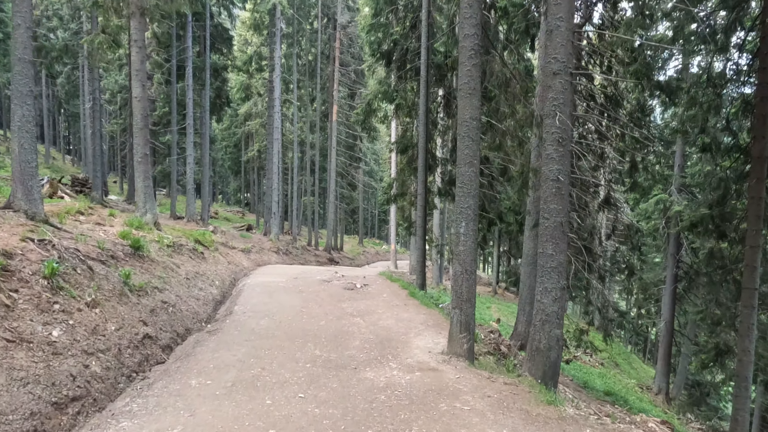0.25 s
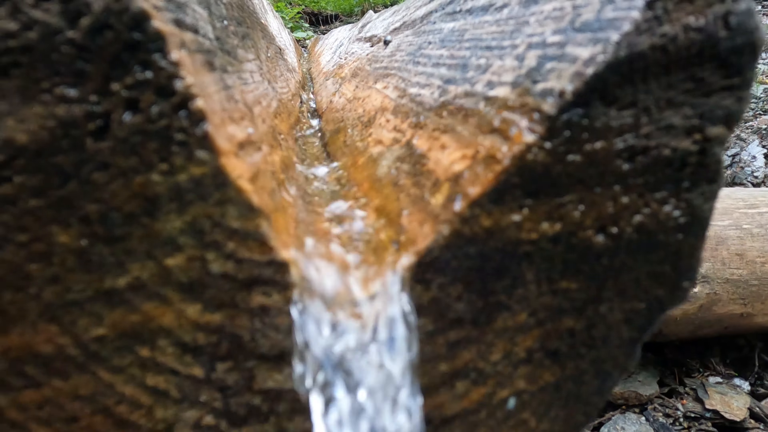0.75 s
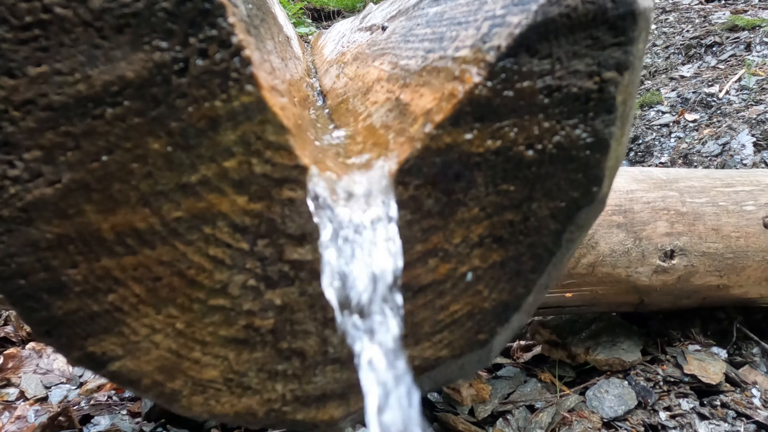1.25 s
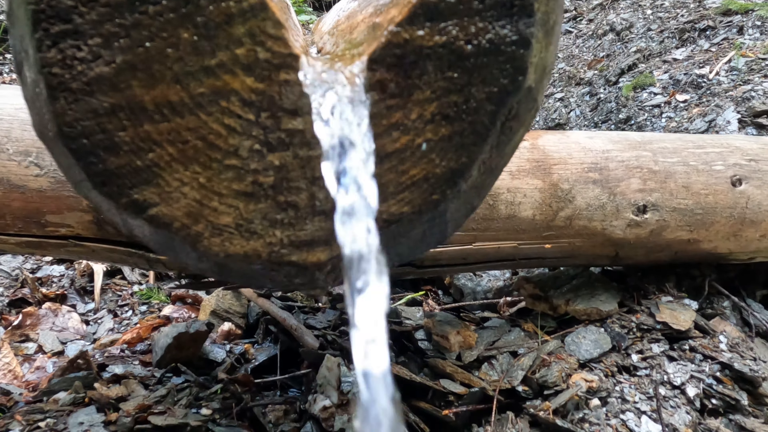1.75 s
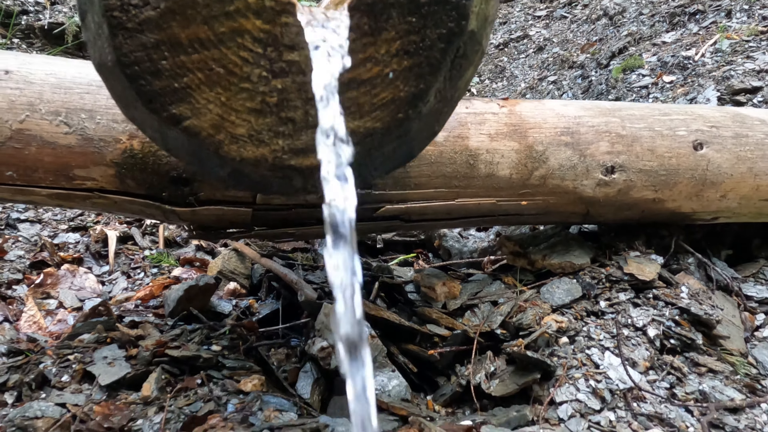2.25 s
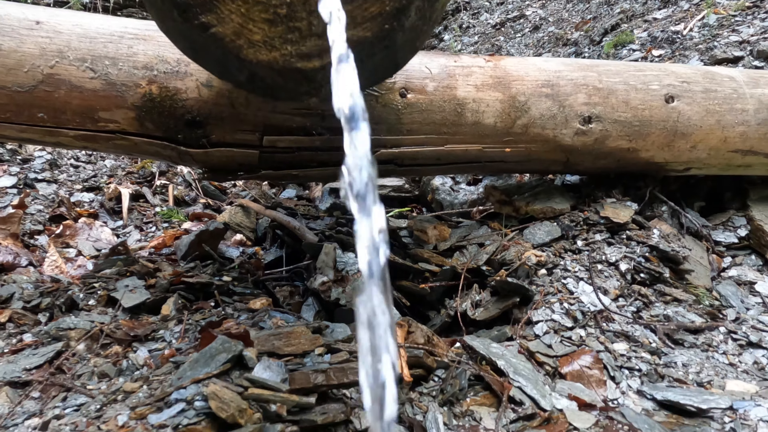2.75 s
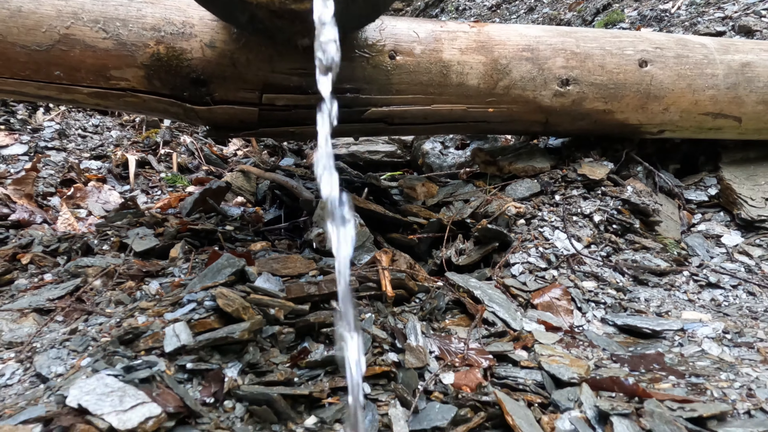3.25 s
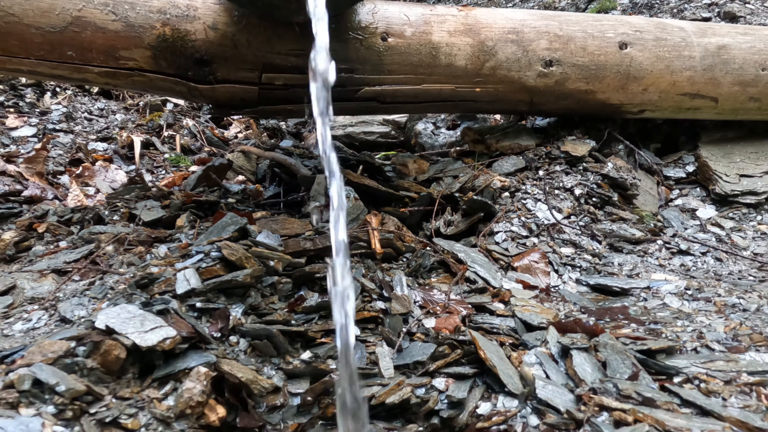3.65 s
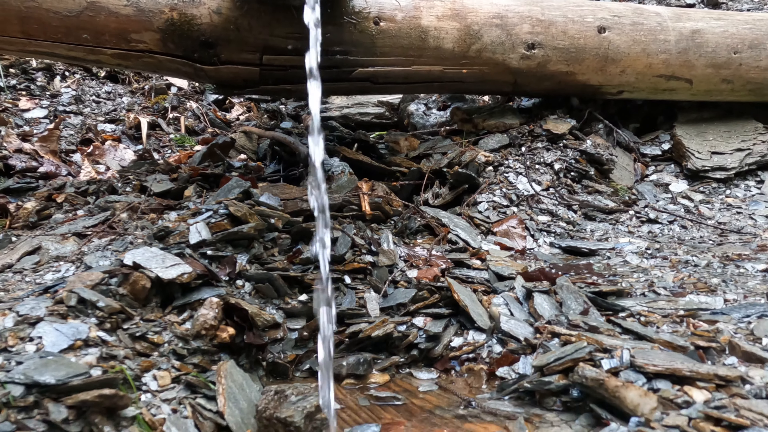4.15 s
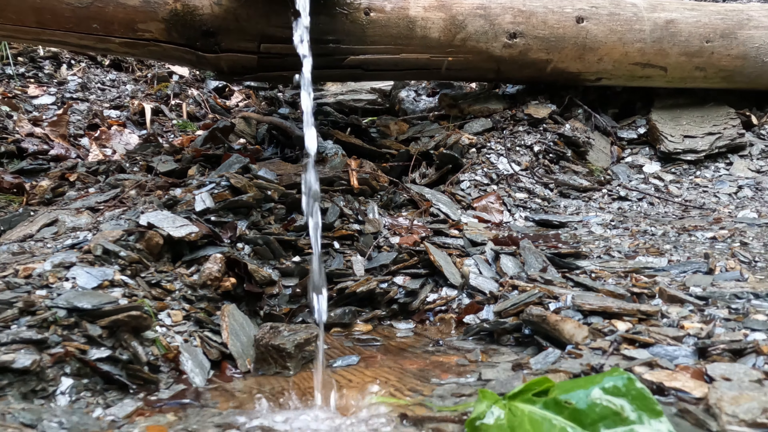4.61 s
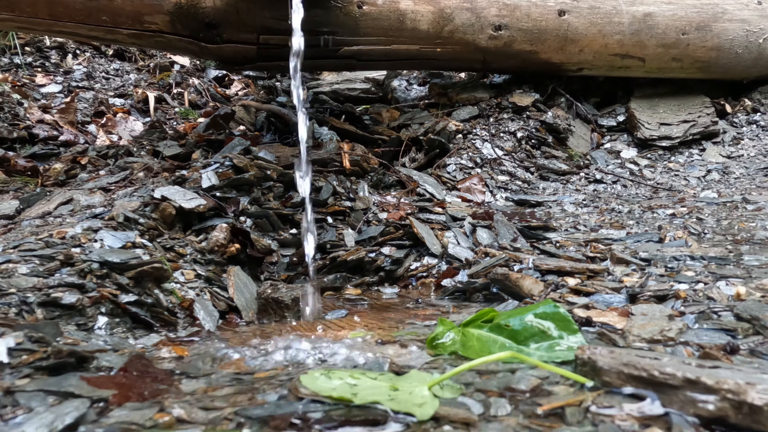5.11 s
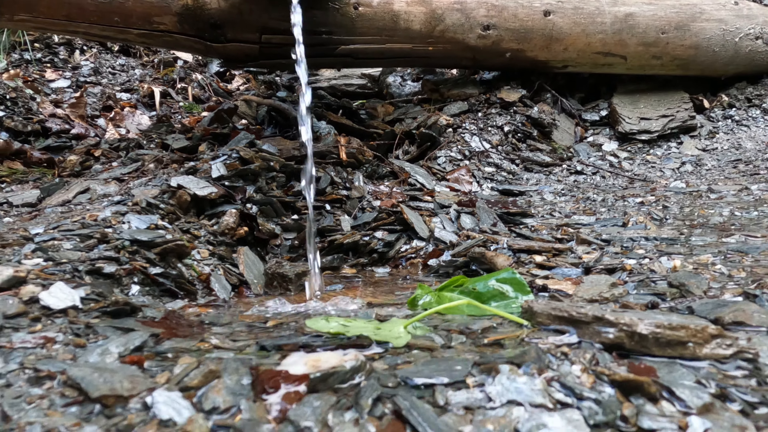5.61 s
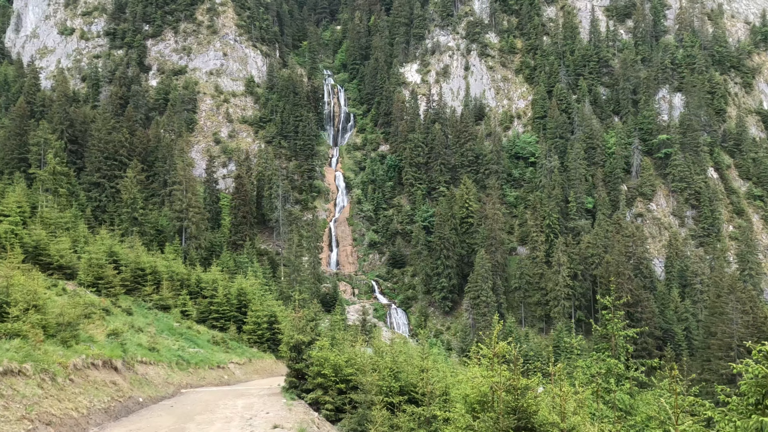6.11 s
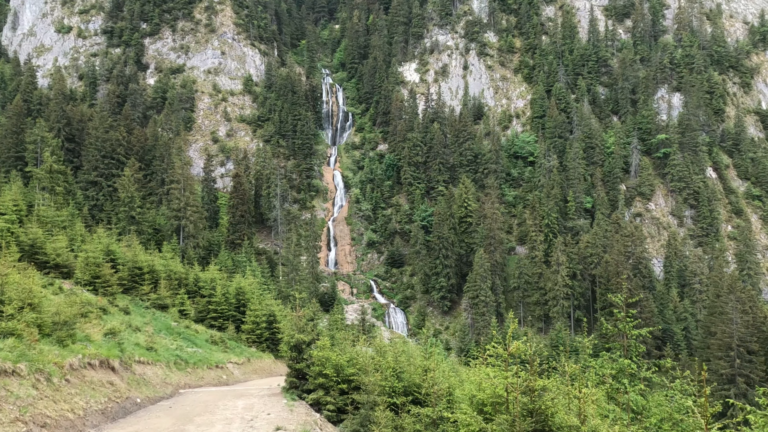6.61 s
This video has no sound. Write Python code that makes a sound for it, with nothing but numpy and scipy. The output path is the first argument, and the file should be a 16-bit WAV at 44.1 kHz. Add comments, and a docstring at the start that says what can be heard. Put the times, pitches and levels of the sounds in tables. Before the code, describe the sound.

A quiet forest path with faint bird whistles and dull footfalls cuts to a thin stream spattering on wet slate, then to a distant waterfall's hiss.

```python
"""Three places in a forest, one after another, with a light wind rumbling on the microphones throughout.
First a quiet track: far bird whistles as gliding tones, soft footfalls as short thumps with grit. Then, close by,
a thin stream falls from a log onto wet slate chips: its slugs slap as bursts of noise, trap air that pops and
rings as decaying tones, and throw up spray of shaped noise. Last the far waterfall, a smooth shaped hiss."""
import sys
import numpy as np
from scipy import signal
from scipy.fft import rfft, irfft
from scipy.io import wavfile
from scipy.ndimage import uniform_filter1d, map_coordinates

SR = 44100
rng = np.random.default_rng(int(sys.argv[2]) if len(sys.argv) > 2 else 0)


def to_wav(sig):
    """Store sig (one row per channel, or 1-D mono) as 16-bit WAV at the path in sys.argv[1].

    Samples outside -1..1 are clipped; the rate is SR.
    """
    pcm = np.clip(np.atleast_2d(sig), -1, 1) * 32767
    pcm = np.round(pcm).astype(np.int16)
    wavfile.write(sys.argv[1], SR, pcm.T)  # frames by channels


N = 302967

# When we stand at the stream. One row: start in seconds, end in seconds.
STREAM_SPAN = (.363, 5.899)
# The largest ringing air bubbles.
# Each row: start in seconds, peak in dB, pitch at the loudest moment in Hz, length in cycles.
BUBBLES = [(0.5062, -35, 720, 5), (0.455, -23.5, 1630, 19), (0.588, -23, 1226, 4.9), (0.598, -25, 1410, 29),
           (0.7215, -27.5, 660, 10), (0.816, -26, 1340, 10), (1.1284, -38, 546, 14),
           (1.154, -31, 990, 12.5), (1.817, -18, 1640, 1.1), (1.9222, -24.5, 2180, 17),
           (1.939, -28, 1164, 6.3), (2.048, -26, 1280, 7.3), (2.126, -32.5, 1010, 16),
           (2.304, -39, 852, 21), (2.4047, -25, 1156, 16), (2.8673, -28.5, 785, 5.9),
           (2.9101, -18, 886, 5.3), (2.935, -18.5, 2140, 16), (3.0873, -24.5, 611, 7.1),
           (3.1107, -38, 655, 18), (3.2065, -19.5, 1287, 11), (3.281, -12.5, 1648, 2),
           (3.315, -17.5, 1830, 5.3), (3.334, -18.5, 2000, 5.6), (3.3826, -22, 827, 6.1),
           (3.403, -13.5, 1620, 1.7), (3.633, -27, 1490, 24), (3.732, -23.5, 1058, 13),
           (3.859, -21.5, 1590, 3.7), (3.947, -27, 584, 3.3), (4.063, -20, 1036, 8.9),
           (4.0643, -16.5, 2080, 6.6), (4.0945, -20.5, 1347, 22), (4.1733, -27, 529, 7.2),
           (4.2714, -23, 750, 1.6), (4.3098, -13, 2110, 6.1), (4.3379, -23.5, 897, 11.5),
           (4.48, -18.5, 2040, 5.8), (4.495, -19.5, 1440, 3.8), (4.691, -17, 1370, 5.4),
           (4.8067, -14, 1930, 3.2), (4.875, -23.5, 887, 4.4), (4.8799, -19.5, 1497, 9.2),
           (4.8954, -29.5, 720, 9.1), (5.3257, -21, 1306, 14), (5.4598, -27, 1460, 19),
           (5.486, -24, 919, 4), (5.579, -24, 880, 2.1), (5.849, -25, 670, 1.6)]
# Slugs of water slapping the stone. Each row: start in seconds, peak of the pop in dB,
# its middle pitch in Hz, upward sweep in octaves, length in ms.
SPLATS = [(0.3973, -18, 5900, 0.82, 2.3), (0.5292, -14.4, 4460, 0.75, 2.1), (0.6282, -19, 3220, 0.55, 2.9),
          (0.6504, -15.5, 4170, 0.8, 2.2), (0.775, -14, 2800.0, 0.3, 2.8), (0.7885, -20.5, 4500, 1.6, 2.05),
          (0.8617, -16.5, 3120, 0.9, 5), (0.867, -18, 2880, 0.35, 3), (0.976, -16.5, 5200, 0.41, 2.7),
          (0.9944, -15.6, 3940.0, 0.92, 3.3), (1.1214, -10.5, 2980, 1.9, 2.2),
          (1.2629, -16.5, 6330, 1.2, 2.8), (1.4958, -17.5, 2810, 0.05, 2.6), (1.6477, -16, 7500, 0.05, 1.9),
          (1.6681, -15, 3980, 1.4, 1.4), (1.75, -17, 3940.0, 0.5, 1.9), (1.7572, -19.5, 3970, 0.49, 4.8),
          (1.7926, -14, 3600, 0.05, 2), (1.849, -15, 2620, 0.05, 2.4), (2.1706, -14.3, 2760, 0.05, 1.7),
          (2.2204, -13.5, 3900, 2.4, 1.9), (2.2704, -12.5, 7300, 0.05, 1.2),
          (2.2996, -11.5, 4100, 1.9, 1.3), (2.3124, -11, 5270.0, 0.05, 1.5), (2.3284, -14, 3470, 0.05, 2.4),
          (2.3955, -15, 5760, 0.68, 0.88), (2.455, -12.8, 3460, 0.3, 1.63),
          (2.4591, -15.5, 3260, 0.05, 2.8), (2.493, -18, 3700, 0.05, 1.3), (2.5267, -14, 6500, 1.66, 1.34),
          (2.5788, -16, 4740, 0.05, 0.83), (2.621, -13.5, 2380, 1.4, 5.6), (2.748, -10.5, 3730, 1.74, 3.9),
          (2.822, -11, 3240.0, 0.05, 1.6), (2.8715, -12.5, 6500, 0.05, 1.5), (3.0117, -11, 4420, 2, 3),
          (3.0479, -20, 2800.0, 0.05, 2.8), (3.109, -16.5, 3020, 0.05, 3), (3.1243, -14, 2850, 0.05, 2.6),
          (3.1486, -12.1, 3170, 0.05, 2.1), (3.3615, -12.8, 2480, 0.3, 1.8),
          (3.3753, -14, 2670.0, 0.27, 1.1), (3.4694, -11.0, 3470, 2.5, 4.6),
          (3.5099, -8.5, 5020.0, 0.35, 1.34), (3.5274, -9.5, 6800, 1.4, 0.94),
          (3.586, -12, 7200, 0.72, 2.5), (3.6643, -16, 7780.0, 0.82, 2.1), (3.6992, -5.5, 3220, 0.41, 0.98),
          (3.754, -13.5, 5540.0, 1.25, 3.1), (3.809, -13, 5300, 0.05, 2.6),
          (3.9476, -14.5, 5440, 0.046, 1.7), (4.1098, -14.5, 2410, 0.05, 2.7),
          (4.118, -14, 2310.0, 0.3, 5.3), (4.15, -13.5, 2710, 0.05, 5.4), (4.225, -17.5, 4500, 0.05, 4.1),
          (4.3896, -7.5, 5150, 0.05, 0.75), (4.6488, -13, 4050, 1.9, 2.6), (4.7591, -12, 3480, 2.4, 1.9),
          (4.9146, -10, 5860, 1.5, 1.2), (5.1256, -14.5, 3140, 0.05, 1.6), (5.1767, -15, 4060, 2.1, 2.6),
          (5.2009, -7, 3220, 0.9, 2.8), (5.2739, -13.5, 5700, 1.8, 1.2), (5.3677, -14, 4740, 3.6, 1.46),
          (5.4798, -22, 4560.0, 0.05, 4), (5.6186, -13, 7040, 0.05, 1.2),
          (5.6364, -18.1, 3240.0, 0.05, 2.6), (5.8114, -19.5, 5830, 0.05, 3.1)]
# Flow of the stream. Each row: time in seconds, spatter in dB, gurgle of small bubbles above the spatter in dB.
FLOW = [(.36, -34.5, -26), (.9, -36, -4.5), (1.3, -37, -15.5), (1.9, -33, -11), (2.5, -34.5, -5.5),
        (3, -32, -1.5), (3.5, -31.5, -9), (4, -32, -3), (4.5, -33.5, -4), (5, -32.5, -6),
        (5.5, -35.5, -5.5), (5.9, -41, -3.5)]
# The stream breaks and little water lands. Each row: centre in seconds, length in seconds.
LULLS = [(1.249, 0.046), (1.888, 0.034), (2.102, 0.021), (2.241, 0.06), (2.51, 0.065), (3.592, 0.03),
         (5.103, 0.028), (5.242, 0.1), (5.44, 0.026)]
# Colour of the spray. Each row: frequency in Hz, relative density in dB per Hz.
SPRAY = [(240, -14.5), (450, -3), (710, -16.5), (911, 2), (1720, 0), (2780, -1), (4230, -3.5), (5340, 0.5),
         (12000, -15), (14900, -36), (16300, -53)]
# Width of the spray. Each row: frequency in Hz, left-right likeness from 0 to 1.
SPRAY_SAME = [(60, 0.53), (550, 0.49), (15000, 1)]
# Sideways lean of the stream. Each row: frequency in Hz, left minus right in dB.
SPRAY_LEAN = [(5000, 0.2), (9000, 1), (15000, 3.5)]
# Echo off the log end as the microphones move. Each row: time in seconds, delay in ms, level in dB.
LOG_ECHO = [(.5, .27, -7), (1.2, .51, -6), (1.8, .76, -6), (2.8, 1.05, -18)]
# The microphones turn. Each row: time in seconds, left minus right in dB.
TURN = [(.4, 2), (2, 3), (3.3, 0), (5.9, 0)]
# Far bird calls. Each row: start in seconds, held note in seconds, level before flutter in dB.
CALLS = [(.033, .05, -63), (.205, .064, -63)]
# End of a lower whistle. One row: start in seconds, length in seconds, pitch in Hz, level before flutter in dB.
PEEP = (.004, .026, 4290, -61)
# Footfalls. Each row: start in seconds, level in dB, pitch the thump settles to in Hz.
STEPS = [(0.073, -38, 180), (0.1526, -25.5, 170), (0.193, -33, 307)]
# Steady air of the track, of the glade at the stream, and of the far falls.
# Each row: frequency in Hz, relative density in dB per Hz.
TRACK_AIR = [(53, -34), (90, -16), (210, -10), (345, -8.5), (977, -12.5), (2450, -17), (2650, -21.5),
             (6720, -30), (7330, -40), (16000, -53)]
GLADE_AIR = [(53, -20), (90, 7), (721, -7), (926, -47), (1800, -7), (2730, -1), (5560, -11.5), (9000, -13),
             (11700, -23), (19800, -120)]
FALLS_AIR = [(90, -6.5), (460, -8.5), (800, -11), (1070, -9), (1540, -13), (1640, -15), (2520, -13),
             (2640, -23), (2900, -17.5), (5900, -31.5), (8700, -47), (15500, -73)]
# Width of the steady air. Each row: frequency in Hz, left-right likeness from 0 to 1.
AIR_SAME = [(60, 0.78), (180, 1), (3000, 0.96), (15000, 0.67)]
# Colour of the wind at the microphones. Each row: frequency in Hz, relative level in dB.
WIND = [(8.0, 2), (32, 0), (47, -3), (81, -17), (140, -22), (180, -18.5), (310, -120)]
# Gusts. Each row: time in seconds, mean level of the two sides in dB.
GUSTS = [(0, -43), (1, -42.5), (2.2, -42), (4, -42.5), (4.7, -38), (5.3, -38.5), (5.8, -37.5), (6.2, -43),
         (6.6, -36.5), (6.87, -43)]

TRACK_DB, GLADE_DB, FALLS_DB = -54, -49, -40.5  # levels of the steady air
GLIDE = 0.055  # rise of a bubble's pitch, as a share of it, over one swelling time
FIZZ_PER_S, FIZZ_CYCLES = 1100, 8  # fine bubbles under unit force, scale of their length
PLINKS_PER_S, PLINK_CYCLES = 650, 13  # the same for larger bubbles
# slap under each pop: base level, share of the pop's dB, dB per ms of the pop, scale of chance
SLAP_DB, SLAP_FOLLOW, SLAP_DB_PER_MS, SLAP_SPREAD_DB = -17.5, 0.31, -2, 2.5
DROPS_PER_S, DROP_SPREAD_DB = 130, 4.5  # lesser drops under unit force, spread of their level
CLUMP_S, SPLUTTER_S = .006, .002  # smoothing times of the spatter's clumps and flickers
LULL_DB = -13.5
SPRAY_PATCHY_DB, SPRAY_STEADY = 2.6, .36  # unevenness, part that ignores the slugs
LEFT_LAG_S = 1.6e-5
SLIDE_S, SWOOP_S = .02, .064
SLIDE_DB, FADE_DB, SWELL_DB = -3, -10, 10  # at the slide's start, across the hold, across the swoop
SLIDE_HZ, HOLD_HZ, SWOOP_HZ, SWOOP_BEND = 6600, 6900, 4600, 1.4  # start, held note, end, curve of the fall
STEP_T60 = 0.04  # seconds to fall 60 dB
WIND_OWN = .4  # amplitude share of the wind that only the right microphone hears
EDGE_HZ = 16300


def stream():
    """Falling water close by: bubbles, slaps and spray at one spot, moving across as the microphones turn."""
    running = breaks()
    level = amp(curve(FLOW, axis=1)) * running
    slaps = []
    for (s, db, *_, ms), luck in zip(SPLATS, rng.uniform(-1.6, 1, len(SPLATS))):
        slaps.append((s, SLAP_DB + SLAP_FOLLOW * db + SLAP_DB_PER_MS * ms + SLAP_SPREAD_DB * luck))
    force = slugs(slaps, -24.0, 0.0018, 8.9, CLUMP_S, SPLUTTER_S)
    churn = slugs(BUBBLES, -16.5, 0.02, 8.3, 0.029, 0.0075)

    fizz = small_bubbles(force, 1903, 13500, FIZZ_PER_S, 8.3, FIZZ_CYCLES)
    plinks = small_bubbles(churn, 756, 3497, PLINKS_PER_S, 4.9, PLINK_CYCLES)
    out = level * amp(-3.5) * fizz
    out += level * amp(curve(FLOW, axis=2)) * plinks

    large = gurgle()
    for s, db, *ring in SPLATS:
        add(large, s, amp(db) * pop(*ring))
    out += large + amp(-11) * stones(large)

    spray = hiss(SPRAY, SPRAY_SAME, SPRAY_PATCHY_DB)
    out += level * amp(-8.5) * (evened(force) + SPRAY_STEADY) * spray
    treble = signal.sosfilt(signal.butter(2, 1900, "high", fs=SR, output="sos"), spray)
    hits = slap_envelope(slaps) + level * lesser_drops(force)
    out += amp(13.5) * hits * evened(treble)

    out = lean(out + echo(out, LOG_ECHO))
    turned = out * amp(np.outer([.5, -.5], curve(TURN, axis=1)))
    return turned + amp(GLADE_DB) * hiss(GLADE_AIR, AIR_SAME, 0.89)


def breaks():
    """Gain of the falling water: it sinks smoothly in each lull."""
    t = np.arange(N) / SR
    return amp(LULL_DB * sum(np.exp(-(2 * (t - s) / long) ** 4) for s, long in LULLS))


def slugs(events, usual_db, spray_s, clump_db, slow_s, quick_s):
    """Force of landing water: random clumps that thin before each event, and a dying spray after it."""
    landed = np.zeros(N)
    for s, db, *_ in events:
        landed[round(s * SR)] += amp(db - usual_db) ** 2
    spray = fading(landed, spray_s)
    uneven = 0.5 * wander(slow_s) + 0.34 * wander(quick_s)
    clumps = amp(clump_db * np.tanh(uneven))  # a thin stream carries only so much
    gathering = fading(landed[::-1], 0.01)[::-1]
    clumps /= 1 + 1.2 * gathering  # the stream thins just before a large slug arrives
    return np.sqrt(0.25 * clumps ** 2 + uniform_filter1d(spray, size=60))


def slap_envelope(slaps):
    """Water striking stone: a soft-edged onset with a quick fall and a weaker, longer one."""
    slap, t = np.zeros(N), np.arange(2000) / SR
    fall = amp(-60 * t / 0.0019) + .5 * amp(-60 * t / 0.015)
    for s, db in slaps:
        add(slap, s, amp(db) * fall * (1 - np.exp(-t / 0.0012)))
    return slap


def lesser_drops(force):
    """Small drops tick at random, more often while the landing water is strong."""
    sizes = amp(DROP_SPREAD_DB * np.minimum(rng.exponential(1, N), 3) - 15.5)
    fallen = rng.random(N) < DROPS_PER_S / SR * evened(force)
    return fading(sizes * fallen, 0.00096)


def pop(hz, octaves, ms):
    """Air caught under a slug rings briefly, sweeping up as its pocket closes."""
    u = np.arange(0, ms / 1000, 1 / SR) * 1000 / ms
    return np.sin(np.pi * u) * np.sin(2 * np.pi * np.cumsum(hz * 2 ** (octaves * (u - .5))) / SR)


def bubble(hz, cycles, glide):
    """A trapped bubble swells, rings and rises in pitch as it nears the surface."""
    peak = cycles / hz / 3  # seconds to the loudest moment
    u = np.arange(round(7 * peak * SR)) / SR / peak
    return (u * np.exp(1 - u)) ** 2 * np.sin(2 * np.pi * hz * peak * (u + glide * (u ** 2 / 2 - u)))


def gurgle():
    """Each large bubble, with a brood of smaller ones torn from the same pocket of air, mostly higher."""
    out = np.zeros(N)
    for (s, db, hz, cycles), brood in zip(BUBBLES, rng.random((len(BUBBLES), 5, 4))):
        add(out, s, amp(db) * bubble(hz, cycles, GLIDE))
        for late, weak, high, long in brood:
            small_db = db - 4.0 - 2.0 * weak - hz / 300
            small_hz = hz * (0.852 + 0.22 * late + 1.35 * high ** 2)
            ring = bubble(small_hz, 3 + 9 * long, GLIDE)
            add(out, s + (18 * late - 2.5) / hz, amp(small_db) * ring)
    return out


def small_bubbles(force, lo_hz, hi_hz, per_s, spread_db, cycles):
    """Bubbles of 30 sizes, each size at its own spot; more of them, and louder, while a slug lands."""
    out = np.zeros((2, N))
    draw, luck = rng.random((2, N))
    kind = rng.integers(0, 30, N)
    strength = amp(-spread_db * np.maximum(np.log(luck + 1e-9), -1.9))
    struck = strength * force * (draw < per_s / SR * force)
    traits = zip(np.geomspace(lo_hz, hi_hz, 30), *rng.random((3, 30)))
    for k, (hz, long, glide, spot) in enumerate(traits):
        length = cycles * (.5 + 0.79 * long) * (hz / 2000) ** .5
        ring = bubble(hz, length, 4.25 * GLIDE * glide ** 2)
        ring *= amp(read(SPRAY, hz)) * np.sqrt(hz) / np.linalg.norm(ring)
        heard = signal.oaconvolve(struck * (kind == k), ring)[:N]
        # paths to the two microphones differ by a sample or so
        out += [heard, np.roll(heard, shift=round(2 * spot - 1.5))]
    return evened(out)


def stones(x):
    """Short scatter off the log and chips: sparse fading taps, other for each side."""
    taps = rng.choice([-1., 1.], (2, 2600)) * (rng.random((2, 2600)) < .06)
    taps *= amp(-60 * np.arange(2600) / SR / 0.046)
    taps[:, :40] = 0
    return signal.fftconvolve(x[None], taps / np.linalg.norm(taps[0]), axes=1)[:, :N]


def echo(x, path):
    """One dull reflection off rough wood, whose delay and strength drift."""
    at = np.arange(N) - curve(path, axis=1) * SR / 1000
    dull = signal.filtfilt(*signal.butter(1, 4000, fs=SR), x)
    return amp(curve(path, axis=2)) * np.array([map_coordinates(side, [at], order=1) for side in dull])


def lean(x):
    """Place the stream off centre: the left side lags slightly and the two sides differ with pitch."""
    hz = np.fft.rfftfreq(N, 1 / SR)
    lag = np.exp(-2j * np.pi * np.outer([LEFT_LAG_S, 0], hz))
    return irfft(rfft(x) * lag * amp(np.outer([.5, -.5], read(SPRAY_LEAN, hz))), N)


def track():
    """The quiet track: far whistled notes and dull footfalls over steady air."""
    near = bird() + footfalls()
    return near + amp(TRACK_DB) * hiss(TRACK_AIR, AIR_SAME, 0.86)


def bird():
    """Far whistled notes with a falling end; leaves and air make them flutter."""
    notes = np.zeros(N)
    for s, held, db in CALLS:
        add(notes, s, call(held, db))
    s, long, hz, db = PEEP
    add(notes, s, whistle(np.arange(0, long, 1 / SR), hz, db))
    return notes * (.85 + .45 * wander(0.0016))


def call(held, db):
    """A slide up to a held whistle that fades, then a swoop that falls faster as it goes and swells."""
    t = np.arange(0, SLIDE_S + held + SWOOP_S, 1 / SR)
    # progress through each part, 0 to 1
    slide, hold, swoop = (np.clip((t - s) / long, 0, 1) for s, long in
                          [(0, SLIDE_S), (SLIDE_S, held), (SLIDE_S + held, SWOOP_S)])
    hz = SLIDE_HZ + (HOLD_HZ - SLIDE_HZ) * slide + (SWOOP_HZ - HOLD_HZ) * swoop ** SWOOP_BEND
    shape_db = SLIDE_DB * (1 - slide) + FADE_DB * (hold ** 2 - swoop ** 2) + SWELL_DB * swoop
    return whistle(t, hz, db + shape_db)


def whistle(t, hz, db):
    """A soft-edged pure tone."""
    tone = np.sin(2 * np.pi * np.cumsum(hz + 0 * t) / SR)
    return amp(db) * tone * signal.windows.tukey(len(t), .15)


def footfalls():
    """Dull steps on packed earth: a thump whose pitch drops at once, with a band of grit."""
    steps, t = np.zeros(N), np.arange(4000) / SR
    dull = signal.butter(3, [200, 800], "band", fs=SR, output="sos")
    for s, db, hz in STEPS:
        grit = evened(signal.sosfilt(dull, rng.standard_normal(len(t))))
        thump = np.sin(2 * np.pi * hz * (t + 0.0031 * (1 - np.exp(-t / 0.00059))))
        fade = amp(db - 60 * t / STEP_T60) * (1 - np.exp(-t / 0.0011))
        add(steps, s, fade * (thump + 0.47 * grit))
    return steps


def falls():
    """The far waterfall: countless splashes blend into a smooth hiss."""
    return amp(FALLS_DB) * hiss(FALLS_AIR, AIR_SAME, 0.2)


def wind():
    """Lumpy low pressure on both microphones, stronger on the right."""
    z = rfft(rng.standard_normal((2, N))) * amp(read(WIND, np.fft.rfftfreq(N, 1 / SR)))
    a, b = evened(irfft(z, N))
    sides = np.array([a, np.sqrt(1 - WIND_OWN ** 2) * a + WIND_OWN * b])
    return amp(curve(GUSTS, axis=1) + [[-1.7], [1.7]]) * sides


def hiss(spectrum, same, patchy_db):
    """Stereo noise from random short-time spectra with drifting patches."""
    frames, hz = N // 256 + 5, np.fft.rfftfreq(1024, 1 / SR)
    a, b, c, d, patches = rng.standard_normal((frames, 513, 5)).T
    patches = uniform_filter1d(uniform_filter1d(patches, size=12, axis=0), size=14, axis=1)
    like = np.clip(read(same, hz), -1, 1)[:, None]
    left = a + 1j * b
    right = like * left + np.sqrt(1 - like ** 2) * (c + 1j * d)
    z = np.array([left, right]) * amp(read(spectrum, hz)[:, None] + patchy_db * evened(patches))
    return evened(signal.istft(z, nperseg=1024, noverlap=768)[1][:, :N])


def wander(seconds):
    """Smooth chance of unit spread."""
    size = max(round(seconds * SR), 2)
    return evened(uniform_filter1d(uniform_filter1d(rng.standard_normal(N), size), size))


def fading(x, seconds):
    """Let each impulse die away exponentially with this time constant."""
    return signal.lfilter([1], [1, -np.exp(-1 / (seconds * SR))], x)


def amp(db):
    """Amplitude of a level in dB."""
    return 10 ** (np.asarray(db) / 20)


def evened(x):
    """Scale to an RMS of one."""
    return x / np.sqrt(np.mean(x ** 2) + 1e-20)


def read(points, hz):
    """Read a spectrum table along log frequency."""
    f, value = np.transpose(points)
    return np.interp(np.log(hz + 1), np.log(f + 1), value)


def curve(rows, axis):
    """Read one column of a timed table at every sample."""
    rows = np.array(rows)
    return np.interp(np.arange(N) / SR, rows[:, 0], rows[:, axis])


def add(mix, s, sound):
    """Lay a sound into the mix from second s."""
    part = mix[..., round(s * SR):][..., :sound.shape[-1]]
    part += sound[..., :part.shape[-1]]


def scene():
    """Track, stream and falls in turn, joined by very short fades, with wind throughout."""
    t = np.arange(N) / SR
    started, ended = (np.clip((t - s) / 0.0015, 0, 1) for s in STREAM_SPAN)
    places = stream() * (started - ended) + track() * (1 - started) + falls() * ended
    return places + wind()


def record(dry):
    """The band limit."""
    low_pass = signal.firwin(511, EDGE_HZ, window=("kaiser", 9), fs=SR)
    return signal.oaconvolve(dry, low_pass[None], "same")


dry = scene()
out = record(dry)
to_wav(out)
```